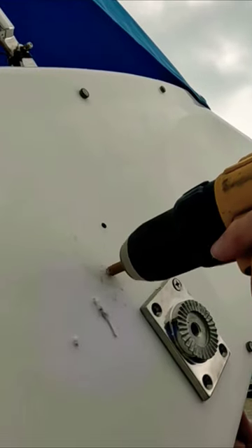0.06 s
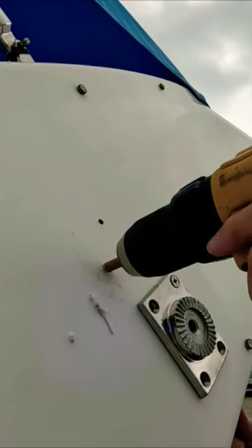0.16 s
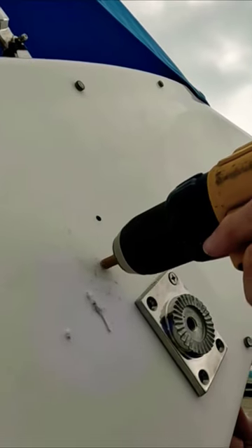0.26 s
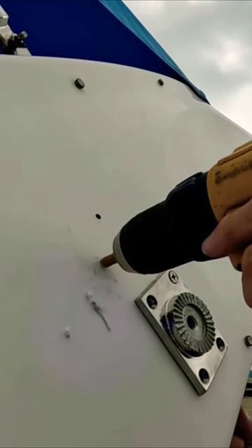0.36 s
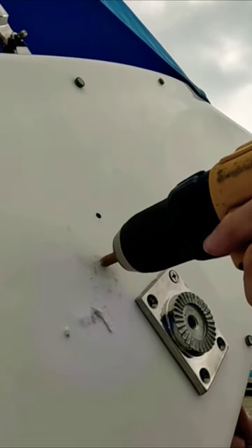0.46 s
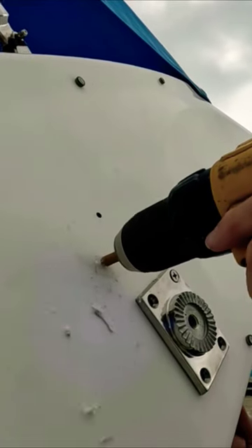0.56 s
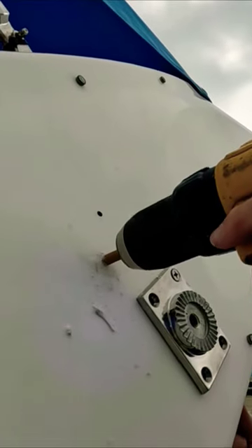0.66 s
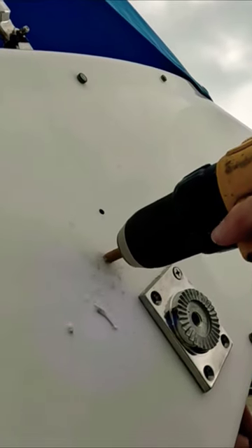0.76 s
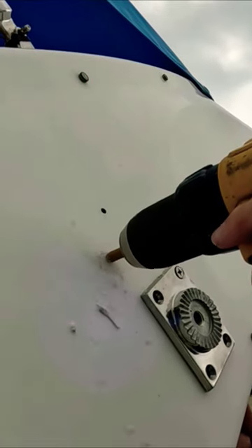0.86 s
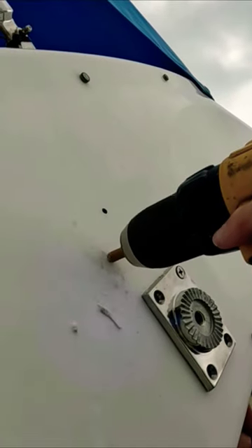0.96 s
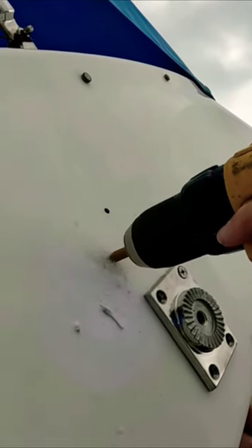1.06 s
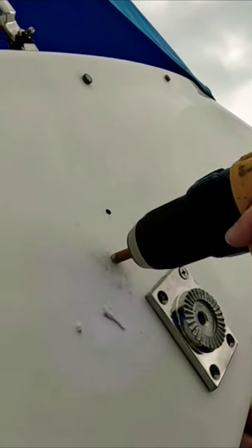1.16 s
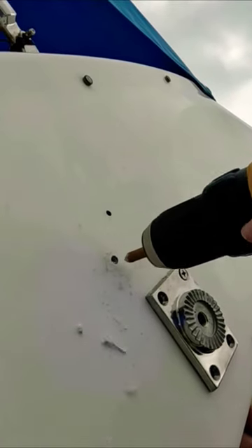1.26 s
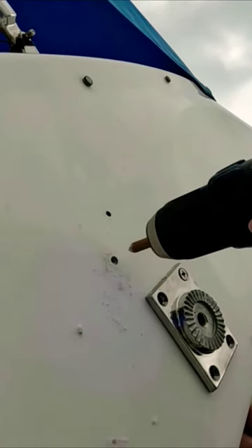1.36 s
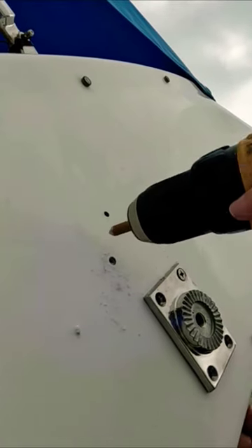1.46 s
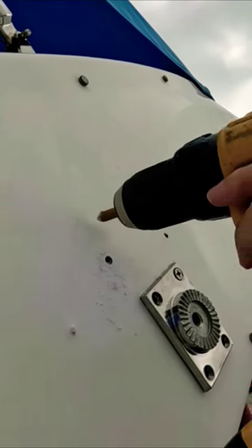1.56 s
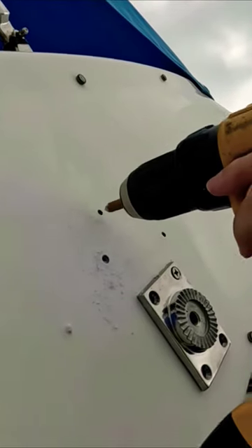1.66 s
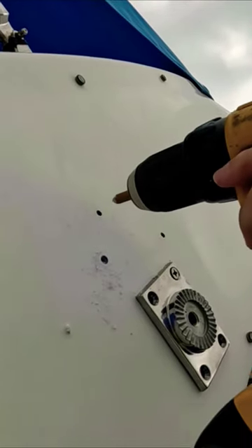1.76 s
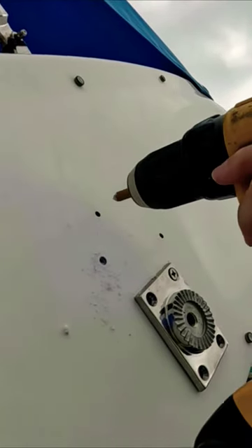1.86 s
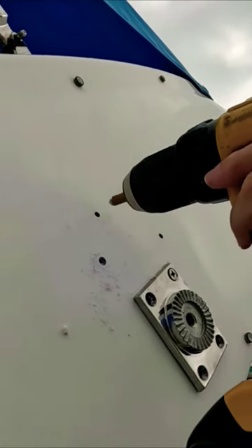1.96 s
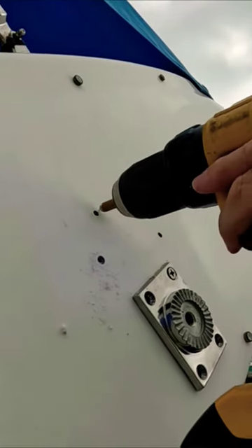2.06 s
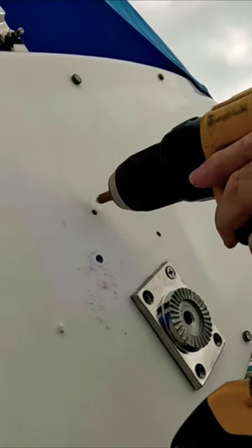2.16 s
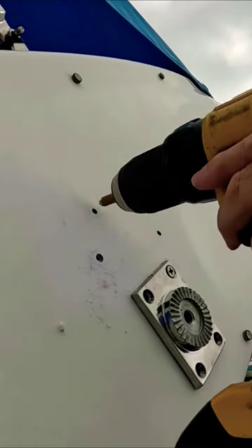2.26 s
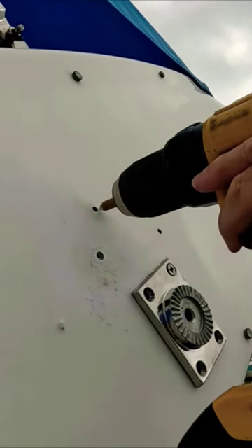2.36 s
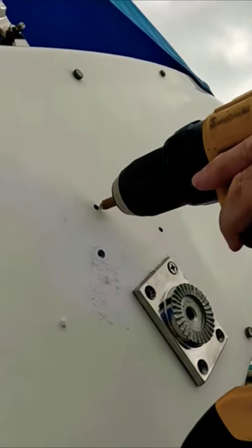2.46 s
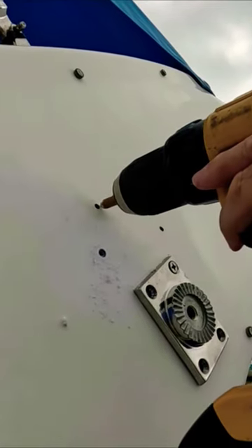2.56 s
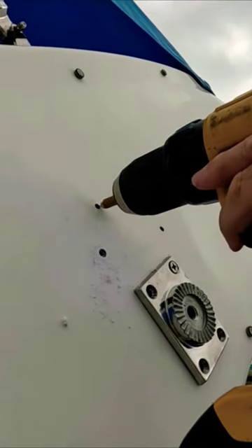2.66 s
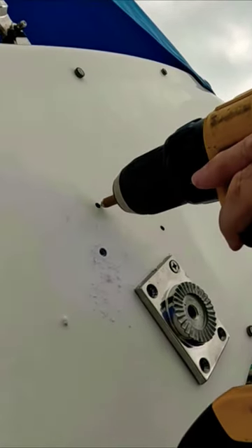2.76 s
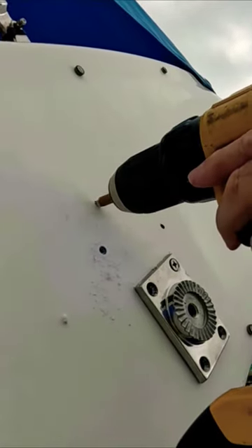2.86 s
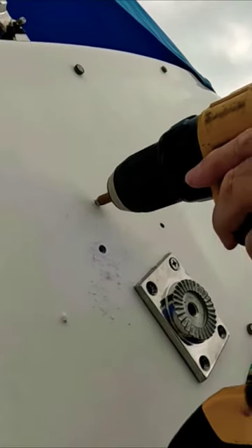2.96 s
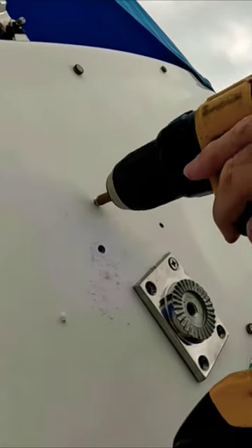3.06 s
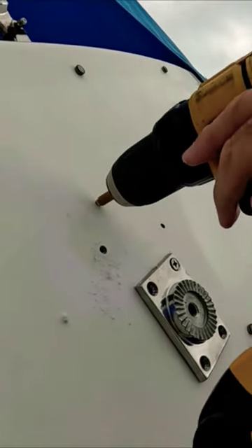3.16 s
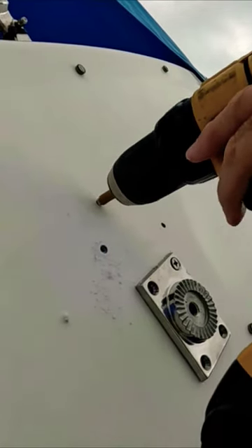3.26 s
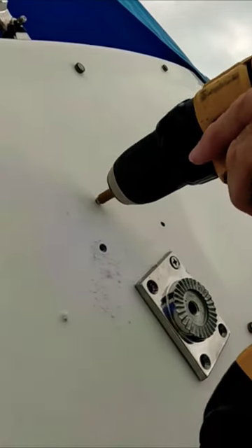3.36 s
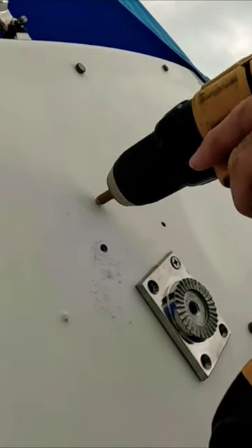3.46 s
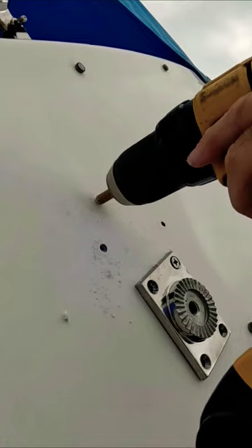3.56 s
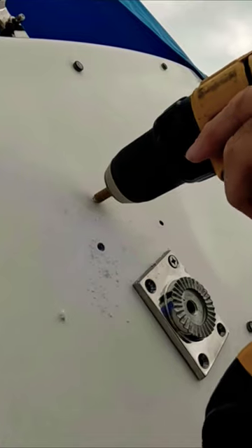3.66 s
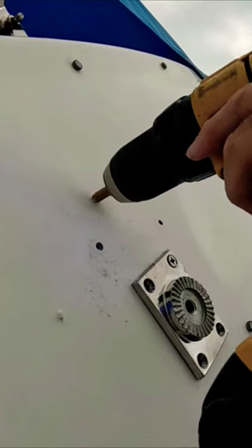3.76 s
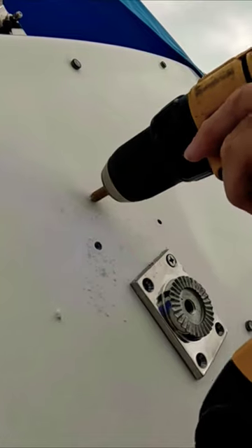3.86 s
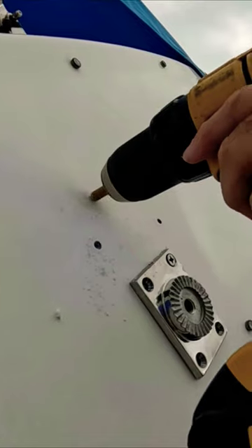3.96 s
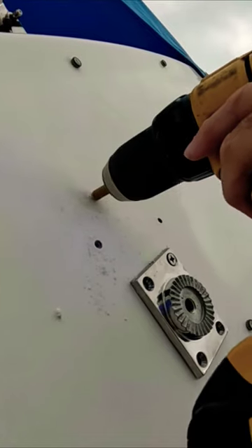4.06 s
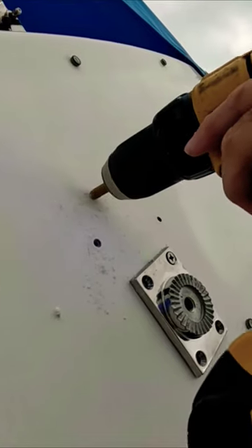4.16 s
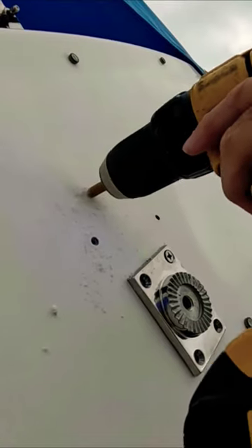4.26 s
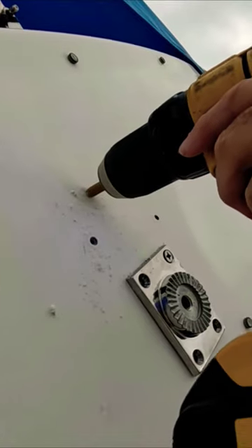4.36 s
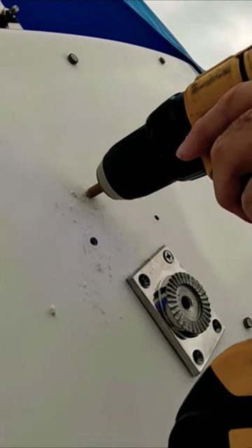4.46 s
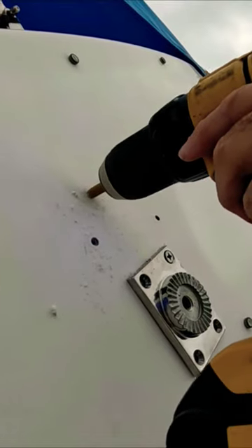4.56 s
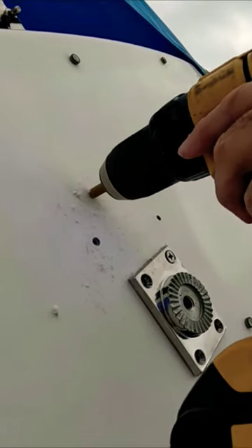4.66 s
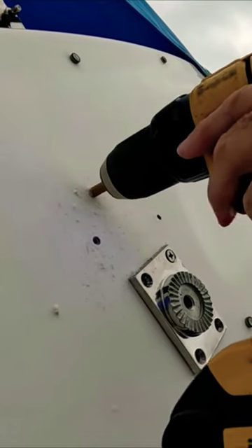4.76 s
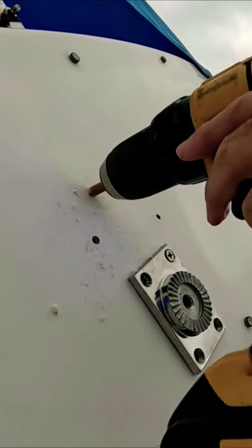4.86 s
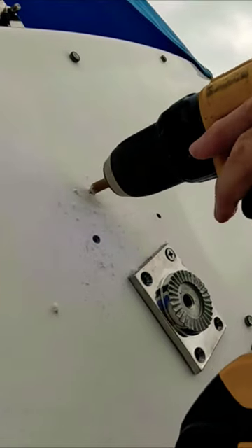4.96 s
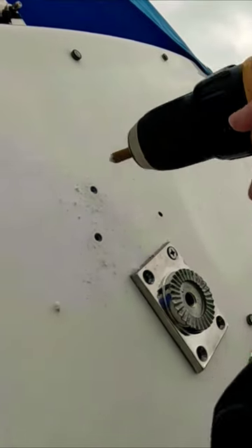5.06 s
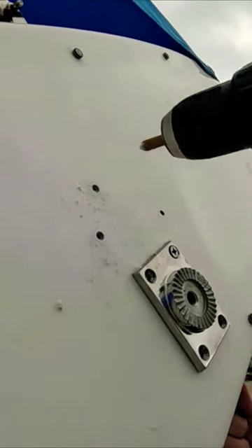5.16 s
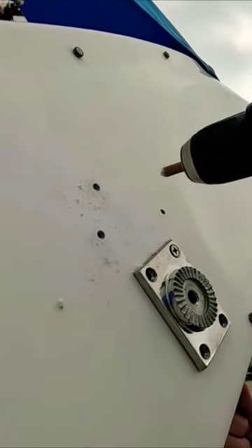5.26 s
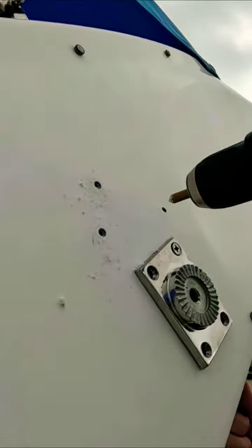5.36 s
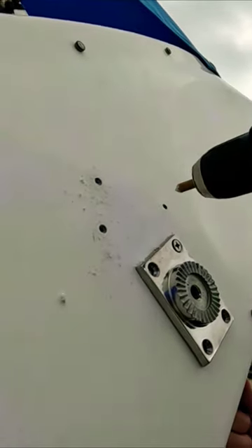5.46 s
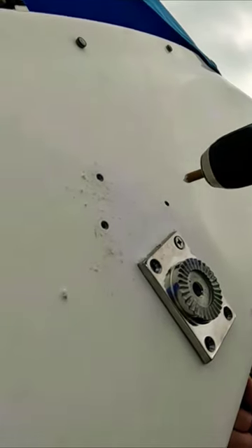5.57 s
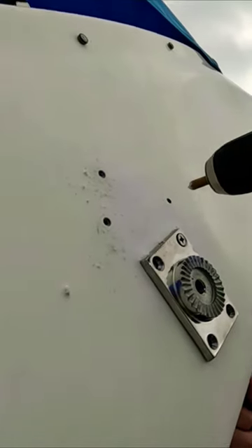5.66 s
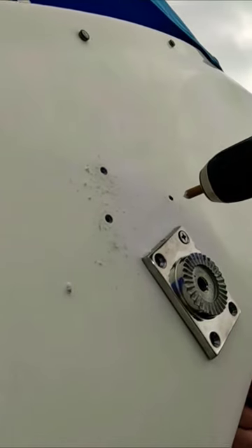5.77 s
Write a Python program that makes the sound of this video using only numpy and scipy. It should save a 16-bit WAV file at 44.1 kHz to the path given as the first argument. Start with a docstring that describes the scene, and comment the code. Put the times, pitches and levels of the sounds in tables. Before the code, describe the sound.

Close drill whine and rattling grind in two runs, separated by a quiet gap with small panel taps over a low harbour rumble.

```python
"""A cordless drill bores two holes in a fibreglass boat panel, outdoors and close to a pair of microphones.
The motor's gears whine along its speed curve and the bit's noise grinds and shakes the panel's modes.
While throttled, its speed control sings one steady note; the slack chuck clacks at each start and stop.
Between the holes the tip bumps the panel, which rings as decaying modes. In the distance a harbour rumbles
as low noise; at the end a sleeve slides as a swell of noise and a faint thin hiss comes in."""
import sys
import numpy as np
from scipy import signal
from scipy.fft import rfft, irfft, next_fast_len
from scipy.io import wavfile
from scipy.ndimage import uniform_filter1d, map_coordinates

SR = 44100
rng = np.random.default_rng(int(sys.argv[2]) if len(sys.argv) > 2 else 0)


def wav_out(sig):
    """Save sig, one row per channel (or a flat mono array), as 16-bit PCM at SR to the path in sys.argv[1]."""
    wavfile.write(sys.argv[1], SR, np.round(np.clip(np.atleast_2d(sig).T, -1, 1) * 32767).astype(np.int16))


N = 256220

# motor speed in each hole, set by trigger and load: (time [s], shaft speed [turns/s])
MOTOR_1 = [(0.0, 239.2), (0.26, 244.5), (0.39, 243.5), (0.56, 238.2), (0.8, 235.2), (0.948, 265.2),
           (1.01, 268.0), (1.056, 254.7), (1.136, 224.0), (1.212, 203.2), (1.256, 199.0), (1.285, 189.5),
           (1.312, 185.5)]
MOTOR_2 = [(3.595, 152.0), (3.612, 208.0), (3.632, 258.0), (3.67, 313.0), (3.72, 339.5), (3.79, 348.0),
           (3.822, 339.0), (3.988, 270.9), (4.022, 268.0), (4.048, 295.0), (4.1, 331.0), (4.164, 342.0),
           (4.32, 285.0), (4.45, 246.5), (4.652, 225.8), (4.708, 223.1), (4.854, 235.8), (4.888, 231.5),
           (4.955, 208.1)]
SPIN_UP_S, COAST_S = 0.03, 0.08  # from rest to the first speed, and from the last speed to rest
WORKING_SPEED = 240  # turns/s, the reference for levels that follow the speed
# gear and commutator lines beside the mesh line, relative levels:
# (multiple of shaft rate [1], half trigger [dB], racing [dB], labouring [dB])
WHINE_LINES = [(15, -47, -53, -51), (17, -50, -42.5, -42), (18, -58, -54, -55), (19, -48, -48, -45),
               (20, -54, -52, -49), (21, -53, -51, -57), (22, -48, -48, -41), (23, -56, -53, -46),
               (24, -56, -56, -58), (25, -56, -53, -49), (26, -50, -62, -51), (27, -59, -58, -53),
               (28, -54, -59, -50), (29, -60, -54, -62), (31, -54, -62, -59), (32, -56, -64, -58),
               (33, -53, -58, -50), (36, -52, -61, -51), (38, -62, -66, -62), (40, -54, -66, -53),
               (41, -63, -66, -53), (43, -69, -70, -56), (45, -65, -73, -60), (46, -72, -76, -53),
               (48, -73, -76, -62)]
MESH = 12  # teeth on the motor's pinion
# level change of the gear mesh line in the first hole: (time [s], level [dB])
MESH_LEVEL_1 = [(0.8, -2), (1.0, -2.5), (1.12, -4), (1.3, -5)]
# the housing's answer to the gear mesh line: (frequency [Hz], level [dB])
HOUSING = [(900, -58), (1900, -27.5), (2300, -38), (2550, -27.5), (2750, -27.5), (3000, -35.5), (3300, -37),
           (3650, -34.5), (4200, -40.5)]
# the housing's narrow rings, which change the level of each other line as it passes: (frequency [Hz], level [dB])
HOUSING_RINGS = [(4700, 0), (5180, -1), (5290, 4), (5400, -2), (5800, 0), (6150, -2), (6380, 2), (6600, -2),
                 (6880, 3), (7200, -1), (8000, 1), (9800, 2), (12000, 0)]
STRAIN_DB, FULL_STRAIN = 5, 3000  # lift of the mesh line while spinning up; turns/s^2 at which it is full
# the gearbox's rough low partials, relative levels: (multiple of shaft rate [1], working [dB], racing [dB])
GROWL_PARTIALS = [(5, 1, -2), (6, -6, -5), (7, -7, -2), (8, -4, -6), (9, -4, -8), (10, -6, -7),
                  (11, -5, -6), (13, -10, -13), (14, -11, -12)]
# the gearbox's answer to them: (frequency [Hz], level [dB])
GEARBOX = [(1150, -15), (1400, -1), (1900, 0), (2250, 1), (2700, -5), (3800, -4)]
# colour of the cut in each hole: (frequency [Hz], density [dB per Hz])
GRIND_COLOUR_1 = [(350, -10), (500, -2), (700, 7.5), (950, 0), (1400, 5), (2200, 3), (3000, 1), (3700, 2),
                  (4400, -5), (5100, -8), (7000, -15), (8000, -12), (9200, -21.5), (15000, -22)]
GRIND_COLOUR_2 = [(350, 4), (500, 2.5), (700, -2.5), (1000, -1), (1500, 1), (2300, -1), (3000, -1.5),
                  (3700, -3), (4400, -9), (5500, -8.5), (7700, -17.5), (9000, -21.5), (12000, -20),
                  (15000, -31)]
# the bit catches for a moment: (time [s], length [s], panel level change [dB], rasp level change [dB])
CATCHES = [(0.545, 0.26, 2, 1), (0.79, 0.14, 5.5, 1), (0.94, 0.24, 3, 0), (1.187, 0.23, 4, 4),
           (1.323, 0.027, -6, 12), (3.63, 0.081, 14, 2), (4.263, 0.04, 11, 1), (4.922, 0.11, 6.5, 3)]
# the panel's modes under the bit: (frequency [Hz], width [Hz], relative level [dB])
PANEL_MODES = [(95, 42, -13.5), (155.5, 44, -5), (211.6, 38, 1), (301, 84, -6.5), (394, 56, -1.5),
               (681, 34, -9.5)]
# the flutes' pushes on the panel: (multiple of shaft rate [1], relative level [dB])
FLUTE_PUSHES = [(0.655, 3), (1.31, -12)]
FLUTE_TURNS, ROCK_TURNS = 0.655, 0.96  # flute passes and rockings of the drill per shaft turn
# how firmly the flutes grip and how much the drill rocks: (time [s], flutes [dB], rocking [dB])
GRIP_1 = [(0.05, -3, -5), (0.24, -6, -4), (0.36, 2, -5), (0.6, 1, 3), (0.68, -8, 2), (0.8, 1, 0),
          (0.9, -1, -10), (1.04, -3, -8), (1.14, -2, -3), (1.3, -12, -11)]
GRIP_2 = [(3.62, -11, -13), (3.8, 0, 1), (3.95, -4.5, -2.5), (4.2, 1.5, -3), (4.4, -0.5, 0),
          (4.52, -10, -9), (4.65, 2, -9), (4.85, 2, -6.5), (4.95, -15, 7.5)]
# the bit wobbles as it enters or breaks through: (start [s], end [s], level [dB])
SWAYS = [(0, 0.36, -26.5), (0.9, 0.96, -31), (3.63, 3.67, -23), (3.92, 4.25, -31), (4.8, 4.88, -33)]
SWAY_RISE_S, SWAY_FALL_S = 0.18, 0.14
# the trigger is only part way in, so the speed control sings: (start [s], end [s], level [dB])
THROTTLING = [(0, 1.015, -27.5), (1.15, 1.275, -30.5), (3.582, 3.585, -31), (3.99, 4.04, -36.5),
              (4.37, 4.73, -36), (4.82, 4.89, -36)]
SWITCH_HZ = 3906  # the rate at which the speed control chops the current
SWITCH_RISE_S, SWITCH_FALL_S = 0.024, 0.018
# the bit binds and the panel groans on one mode: (start [s], end [s], level [dB])
GROANS = [(0.46, 0.53, -35), (0.92, 0.97, -34), (1.11, 1.24, -32), (4.06, 4.11, -33)]
GROAN_HZ, GROAN_RISE_S, GROAN_FALL_S = 401.6, 0.056, 0.022
# the bit is through and runs free: (start [s], end [s], level [dB])
FREE_RUN = [(1.255, 1.31, 0.5)]
FREE_RISE_S, FREE_FALL_S = 0.026, 0.042
# the lines that stand out meanwhile: (multiple of shaft rate [1], relative level [dB])
FREE_LINES = [(12, -43), (19, -42), (27, -45)]
# gears and chuck clack; the last three levels are relative to the first:
# (time [s], level [dB], panel thud [dB], steel click [dB], body knock [dB])
CLACKS = [(1.315, -19.5, 1, 1, 4.5), (1.3327, -10.5, -7.5, 5.5, 6.5), (1.336, -20, 11, -15, 4),
          (1.343, -25, 6, 9, -5), (1.355, -27, 6, 5.5, 2), (1.3731, -17.5, 3.5, -2, -1),
          (1.394, -28, -2, 1, 3), (1.399, -34, 5, 6, -9), (1.407, -41, 20, 0, -9), (1.43, -45, 1, 17, -11),
          (1.495, -46, -5, -14, 7), (3.529, -37.5, 0, 1, -10), (3.543, -33, -3, -6, -6),
          (3.5686, -15.5, -21, -10, -15), (3.587, -11.5, -11, -15, -7), (3.592, -14.5, -9, -1, -8),
          (3.595, -20, 6.5, -14, -11), (4.955, -9.5, -14, -2, -19), (4.961, -30, -19, -4, -25),
          (4.978, -25.5, 1, -12, -6), (4.992, -32, -6, -12, 0), (5.021, -27.5, -12, -12, -9),
          (5.028, -35, -12, 1, -12), (5.142, -46, -10, -3, -8)]
# colour of the crack and rattle: (frequency [Hz], density [dB per Hz])
CLACK_COLOUR = [(180, 1), (350, -33), (520, -5.5), (680, -21), (850, -3), (1300, -6), (1900, -3.5),
                (3000, -9.5), (4200, -17), (5500, -16), (8000, -23), (10000, -30), (15000, -39)]
# colour of the chuck's steel click: (frequency [Hz], density [dB per Hz])
STEEL_COLOUR = [(1500, -42), (3200, -11), (4100, 7.5), (5300, -9), (6500, -10), (8000, -6.5), (9500, -40),
                (15000, -29)]
# the jolted drill body's ring: (frequency [Hz], relative level [dB], time to fall 60 dB [s])
BODY_MODES = [(690, 1.5, 0.082), (846, -7, 0.14), (1021, -8.5, 0.12), (1368, 0, 0.064), (1560, 1, 0.042),
              (2480, -8, 0.07), (3200, -12, 0.097), (4080, -9, 0.029), (4150, -12, 0.043)]
# change of the panel's ring with the bit held in the hole: (frequency [Hz], level [dB])
PINNED = [(230, 0), (320, -4), (390, -9), (500, 0), (900, 3)]
# the panel's ring after a blow: (frequency [Hz], relative level [dB], time to fall 60 dB [s])
THUD_MODES = [(80.5, 3, 0.17), (136.6, -1, 0.34), (182.3, 1, 0.16), (242, -5, 0.16), (319.2, -5.5, 0.2),
              (386.3, 2.5, 0.12), (480, -10, 0.12), (590, -12.5, 0.077), (877, -16, 0.088),
              (1230, -22, 0.042), (1370, -27, 0.052), (1700, -21, 0.027)]
# the tip lands on the panel three times, stuttering and hopping: (time [s], relative thud [dB], tick [dB])
BUMPS = [(2.286, -13, -27), (2.2902, -15, -36), (2.304, -17.5, -28.5), (2.526, -12.5, -19.5),
         (2.5315, -14, -35), (2.546, -22.5, -28), (2.57, -23, -37), (2.611, -18.5, -34), (2.635, -25, -37),
         (3.048, -17.5, -27.5), (3.0533, -15.5, -31.5), (3.062, -18.5, -32.5), (3.134, -22, -34.5),
         (3.151, -26, -39)]
# colour of the tick: (frequency [Hz], density [dB per Hz])
TICK_COLOUR = [(200, 16.5), (900, 16), (2200, 4), (3200, -8), (6000, -19), (9000, -33.5), (15000, -48)]
# colour of the harbour: (frequency [Hz], density [dB per Hz])
HARBOUR_COLOUR = [(12, -8), (26, -3.5), (40, -2), (60, -7.5), (100, -8), (150, -12), (250, -18.5),
                  (450, -27.5), (650, -32.5), (1050, -31), (2000, -43.5), (4200, -55.5), (7500, -68.5),
                  (9500, -78.5), (15000, -101.5)]
# a distant engine's hum: (time [s], relative level [dB])
HUM_LEVEL = [(0, -34), (1.5, -42), (2.0, -38.5), (3.4, -31), (5.0, -37.5), (5.8, -40.5)]
# cloth slides as the arm draws back: (time [s], rub [dB], swish [dB])
SLEEVE_LEVEL = [(5.0, -60, -70), (5.17, -50, -64), (5.27, -48.5, -62.5), (5.41, -49, -56.5),
                (5.5, -51, -67), (5.81, -57, -67)]
# colour of the rub: (frequency [Hz], density [dB per Hz])
RUB_COLOUR = [(300, 7.5), (700, 0), (1130, 8.5), (1700, -6), (3000, -23), (5500, -34), (14000, -48)]
# colour of the swish: (frequency [Hz], density [dB per Hz])
SWISH_COLOUR = [(900, -18), (1600, 1), (2500, 2), (3900, -2), (5000, -15), (7000, -20), (9000, -20),
                (14000, -36)]
# a faint thin hiss at the end: (time [s], level [dB])
HISS_LEVEL = [(5.38, -84), (5.46, -71), (5.6, -71), (5.81, -73)]
# colour of the hiss: (frequency [Hz], density [dB per Hz])
HISS_COLOUR = [(3500, -20), (5000, -2), (6300, -15), (6700, 0), (7150, -12), (8500, -14), (13000, -18)]
# left-right likeness at the microphones of noise from close by: (frequency [Hz], correlation [1])
NEAR_ALIKE = [(170, 1), (300, 0.98), (550, 0.99), (1200, 0.97), (2500, 0.92), (5000, 0.71), (9000, 0.82),
              (13000, 0.062)]
# left-right likeness of the distant harbour: (frequency [Hz], correlation [1])
FAR_ALIKE = [(25, 0.9994), (180, 0.9997), (550, 0.99), (1650, 0.97), (4970, 0.95), (15000, 0.63)]
TOP_HZ = 15200  # top of the microphones' band


def amp(db):
    """Decibels to gain."""
    return 10 ** (np.asarray(db) / 20)


def unit(x):
    """Scaled to rms 1."""
    return x / np.sqrt(np.mean(x ** 2) + 1e-20)


def along(points, hz):
    """(Hz, value) points joined on a log frequency axis."""
    f, v = np.transpose(points)
    return np.interp(np.log(hz + 1), np.log(f + 1), v)


def curves(rows):
    """One value per sample for each column after the time."""
    s, *cols = np.transpose(rows)
    return [np.interp(np.arange(N) / SR, s, c) for c in cols]


def gate(rows, rise=0.0068, fall=0.13):
    """Open from the first row's time to the last row's, with a short rise before and fall after, in s."""
    start, end = rows[0][0], rows[-1][0]
    return np.interp(np.arange(N) / SR, [start - rise, start, end, end + fall], [0, 1, 1, 0])


def bouts(rows, rise, fall):
    """Attack, hold and release for each (start s, end s, dB) row."""
    return sum(amp(db) * gate([(start,), (end,)], rise, fall) for start, end, db in rows)


def wobble(rate):
    """A smooth random curve, rate knots a second."""
    knots = rng.standard_normal(int(N * rate / SR) + 4)
    coarse = np.arange(0, N + 32, 32)
    return np.interp(np.arange(N), coarse, map_coordinates(knots, [coarse * rate / SR]))


def filtered(x, response):
    """x times a response of frequency, real or complex."""
    m = next_fast_len(N + SR // 2)
    return irfft(rfft(x, m) * response(np.fft.rfftfreq(m, 1 / SR)), m)[..., :N]


def rush(spectrum, drive=1, alike=NEAR_ALIKE):
    """Coloured noise of rms 1 at two microphones, whose likeness depends on frequency."""
    def mid_side(hz):
        turn = np.arccos(np.clip(along(alike, hz), -1, 1)) / 2
        return amp(along(spectrum, hz)) * [np.cos(turn), np.sin(turn)]
    mid, side = filtered(rng.standard_normal((2, N)) * drive, mid_side)
    return unit(np.array([mid + side, mid - side]))


def add(track, s, sound):
    """Mix a sound in at a time."""
    part = track[..., round(s * SR):][..., :sound.shape[-1]]
    part += sound[..., :part.shape[-1]]


def harbour(air_db=-34, hum_db=-1):
    """Low distant outdoor rumble with the wavering hum of a far engine, a narrow band of noise near 96 Hz."""
    hum_colour = [(60, -36), (86, 9.5), (96, 15.0), (106, 4.0), (150, -67.0), (300, -120)]
    hum = rush(hum_colour, alike=FAR_ALIKE)
    air = rush(HARBOUR_COLOUR, alike=FAR_ALIKE)
    return amp(air_db + 0.56 * wobble(5.1)) * air + amp(curves(HUM_LEVEL)[0] + hum_db) * hum


def spin(motor):
    """Shaft turns per s: up from rest, along the speed curve, then coasting to a stop."""
    speed = curves([(motor[0][0] - SPIN_UP_S, 0), *motor, (motor[-1][0] + COAST_S, 0)])[0]
    return np.maximum(uniform_filter1d(speed, size=700), 1)  # never quite zero, for the logarithm in effort


def racing(motor):
    """0 up to working speed, 1 when the motor races."""
    return np.interp(spin(motor), [240, 280], [0, 1])


def effort(motor, db_per_octave):
    """Level in dB that follows the speed."""
    return db_per_octave * np.log2(spin(motor) / WORKING_SPEED)


def shaft(motor, jitter):
    """Shaft angle in radians; the bite of the bit makes the speed tremble, more when it races."""
    speed = spin(motor)
    tremble = jitter * (speed / WORKING_SPEED) ** 2 * wobble(90)
    return 2 * np.pi * np.cumsum(speed * (1 + tremble)) / SR


def line(angle, multiple, db, flutter_db, spread, smear=0):
    """One fluttering motor line, its phase smeared by chatter and slightly out of step at the two microphones."""
    start, lead = rng.uniform(0, 2 * np.pi), rng.normal() * spread * multiple
    fading_db = 1.5 * wobble(7) * (multiple != MESH)  # all but the mesh line slowly come and go
    phase = multiple * angle + start + smear * wobble(220)
    level = amp(db + fading_db + flutter_db * wobble(60))
    return np.sqrt(2) * level * np.sin(phase + np.array([[lead], [-lead]]))


def whine(motor, angle, line_dbs, mesh_db, upper_db, mesh_flutter_db, flutter_db):
    """The gear mesh line, loudest where it meets the housing's resonance, and a comb of other shaft multiples."""
    speed = spin(motor)
    acceleration = uniform_filter1d(np.gradient(speed) * SR, size=5000)
    unsettled = np.clip(np.abs(acceleration) / 200, 0, 1)
    smear = .2 + .45 * racing(motor)
    comb = 0
    for (multiple, *_), db in zip(WHINE_LINES, line_dbs):
        ring_db = along(HOUSING_RINGS, multiple * speed)
        loss_db = 4 * (multiple > 30) * unsettled  # the highest lines weaken while the speed changes
        comb = comb + line(angle, multiple, db + ring_db - loss_db, flutter_db, spread=0.0046, smear=smear)
    strain_db = STRAIN_DB * np.clip(acceleration / FULL_STRAIN, 0, 1)
    housing_db = along(HOUSING, MESH * speed)
    mesh = line(angle, MESH, housing_db + mesh_db + strain_db, mesh_flutter_db, spread=0.0037)
    driven = gate(motor, rise=.004, fall=.02)
    return driven * (mesh + amp(upper_db) * np.clip(speed / 200, 0, 1) ** 3 * comb)


def growl(motor, angle, growl_db, db_per_octave, unrest, wander):
    """Slack gear teeth: low shaft partials waver in strength, and in phase by wander radians, unrest knots a second."""
    speed, fast = spin(motor), racing(motor)
    partials = 0
    for multiple, db, fast_db in GROWL_PARTIALS:
        level_db = db + fast * (fast_db - db) + along(GEARBOX, multiple * speed) + 3 * wobble(90)
        partials = partials + amp(level_db) * np.sin(multiple * angle + wander * wobble(unrest))
    return np.sqrt(2) * gate(motor) * amp(growl_db + effort(motor, db_per_octave)) * partials


def panel(hz):
    """The panel's response to a push: a sum of resonances of alternating sign."""
    return sum((-1) ** k * amp(db) * 1j * hz * width / (centre ** 2 - hz * hz + 1j * hz * width)
               for k, (centre, width, db) in enumerate(PANEL_MODES))


def catches():
    """Level changes in dB of the panel and of the rasp: one smooth swell for each catch."""
    t = np.arange(N) / SR
    return sum(np.outer([panel_db, rasp_db], np.exp(-(2 * (t - s) / length) ** 2))
               for s, length, panel_db, rasp_db in CATCHES)


def shudder(motor, angle, grip, tone_db, rough_db, db_per_octave):
    """Sway, flute pushes and rocking keep step with the shaft and shake the panel; chips knock it at random."""
    def tone(multiple, db, unrest):
        level = amp(db + unrest * (2.4 * wobble(24) - .7))
        return level * np.sin(multiple * angle + .28 * unrest * wobble(30))
    flute_db, rock_db = curves(grip)
    push = sum(tone(multiple, db + flute_db, unrest=1) for multiple, db in FLUTE_PUSHES)
    push = push + tone(ROCK_TURNS, rock_db, unrest=2.16)
    level = amp(effort(motor, db_per_octave)) * gate(motor)
    catch_db = catches()[0]
    tones = filtered(push * level * amp(catch_db), lambda hz: 0.53 + np.abs(panel(hz)))
    chips = rng.standard_normal(N) * amp(1.3 * wobble(120))
    knocks = amp(catch_db / 2) * unit(filtered(chips, panel))
    sway_level = np.sqrt(2) * bouts(SWAYS, SWAY_RISE_S, SWAY_FALL_S) * gate(motor)
    sway = sway_level * tone(FLUTE_TURNS / 2, 0, unrest=0.42)
    return sway + amp(tone_db) * tones + amp(rough_db) * level * knocks


def rattle(angle, scatter=1.2, spread_db=4):
    """The bit knocks against the wall of the hole about once a turn, unevenly in time and strength."""
    turns = np.floor((angle + scatter * wobble(150)) / (2 * np.pi))
    knocks = np.diff(turns, prepend=turns[0]) != 0
    return knocks * amp(spread_db * np.clip(rng.standard_normal(N), -2, 1))


def cut(motor, colour, angle, grind_db, rasp_db, db_per_octave, bite, chips_db, rattle_db, rattle_t60=0.0091):
    """Flutes scrape in pulses and tear off chips: a grinding, rattling body and a rasp, both louder with speed."""
    pulses = 1 + bite * np.cos(angle * FLUTE_TURNS + wobble(30))
    drive = pulses * amp(chips_db * wobble(500) + 0.45 * wobble(70))
    bursts = signal.lfilter([1], [1, -amp(-60 / (rattle_t60 * SR))], rattle(angle))  # each knock dies away
    noise = rush(colour, drive)
    muffle = lambda hz: 1 / (1 + (hz / 4000) ** 6)
    low = filtered(noise, muffle)
    rattling = filtered(rush(colour, bursts * drive), muffle)
    body = unit(unit(low) + amp(rattle_db) * unit(rattling))
    rasp = unit(noise - low)
    level = gate(motor, rise=0.029, fall=0.046) * amp(effort(motor, db_per_octave))
    return level * (amp(grind_db) * body + amp(rasp_db + catches()[1]) * rasp)


def run_down(angle):
    """With the bit through, the slowing motor's lines come clear."""
    lines = sum(line(angle, multiple, db, flutter_db=0.5, spread=0.008) for multiple, db in FREE_LINES)
    return bouts(FREE_RUN, FREE_RISE_S, FREE_FALL_S) * lines


def first_hole():
    """Half trigger: a fairly even speed, sagging under load, until the bit is through."""
    angle = shaft(MOTOR_1, jitter=.0004)
    motor = whine(MOTOR_1, angle, [row[1] for row in WHINE_LINES], mesh_db=curves(MESH_LEVEL_1)[0],
                  upper_db=.8, mesh_flutter_db=1.1, flutter_db=1.8)
    gears = growl(MOTOR_1, angle, growl_db=-40, db_per_octave=4, unrest=170, wander=1.3)
    shaking = shudder(MOTOR_1, angle, GRIP_1, tone_db=-28.8, rough_db=-30.5, db_per_octave=-1)
    cutting = cut(MOTOR_1, GRIND_COLOUR_1, angle, grind_db=-31.0, rasp_db=-39, db_per_octave=9.5,
                  bite=0.043, chips_db=0.75, rattle_db=-11)
    return motor + gears + shaking + run_down(angle) + cutting


def switching(octave_db=-25):
    """The chopped motor current makes the windings sing at one fixed rate and, faintly, its octave."""
    phase = 2 * np.pi * SWITCH_HZ * np.arange(N) / SR + 0.5 * wobble(83)
    lead = np.array([[.25], [-.25]])  # radians, out of step at the two microphones
    note = np.sin(phase + lead) + amp(octave_db + 1.3 * wobble(57)) * np.sin(2 * phase + lead)
    flutter_db = .9 * wobble(90)
    return np.sqrt(2) * bouts(THROTTLING, SWITCH_RISE_S, SWITCH_FALL_S) * amp(flutter_db) * note


def groan():
    """The binding bit keeps one mode of the panel sounding."""
    phase = 2 * np.pi * GROAN_HZ * np.arange(N) / SR + .3 * wobble(25)
    return np.sqrt(2) * bouts(GROANS, GROAN_RISE_S, GROAN_FALL_S) * np.sin(phase)


def struck(modes, t, attack=0.00031):
    """A struck body rings; each blow favours other modes, so strengths and pitches shift."""
    detune = 1 + rng.normal(0, .03, len(modes))
    ring = 0
    for k, (hz, db, t60) in enumerate(modes):
        decay = amp(db + rng.normal(0, 3.2) - 60 * t / t60)
        ring = ring + (-1) ** k * decay * np.sin(2 * np.pi * hz * detune[k] * t)
    return ring * (1 - np.exp(-t / attack))


def clacks(crack_db=-3, crack_t60=0.0096, rattle_db=-16, rattle_t60=0.1, thud_db=-11,
           click_db=-3, click_t60=0.01, knock_db=-15, rise=0.00057):
    """Slack in gears and chuck is taken up: crack and rattle, body knock, steel click and a jolt to the panel."""
    ring, crack, click, t = np.zeros(N), np.zeros(N), np.zeros(N), np.arange(SR // 2) / SR
    contact = 1 - np.exp(-t / rise)
    crack_decay = amp(crack_db - 60 * t / crack_t60) + amp(rattle_db - 60 * t / rattle_t60)
    pinned = [(hz, db + along(PINNED, hz), t60) for hz, db, t60 in THUD_MODES]
    for s, db, low_db, steel_db, body_db in CLACKS:
        add(crack, s, amp(db) * contact * crack_decay)
        add(click, s, amp(db + steel_db + click_db - 60 * t / click_t60) * contact)
        add(ring, s, amp(db + low_db + thud_db) * struck(pinned, t))
        add(ring, s, amp(db + body_db + knock_db) * struck(BODY_MODES, t))
    return ring + crack * rush(CLACK_COLOUR) + click * rush(STEEL_COLOUR)


def bumps(thud_db=-8, tick_t60=0.056, tick_rise=0.0025):
    """The tip lands, stutters and rebounds: each contact is a panel thud and a short scratchy tick as it skids."""
    ring, tick, t = np.zeros(N), np.zeros(N), np.arange(SR // 2) / SR
    for s, db, scratch_db in BUMPS:
        add(ring, s, amp(db + thud_db) * struck(THUD_MODES, t))
        add(tick, s, amp(scratch_db - 60 * t / tick_t60) * (1 - np.exp(-t / tick_rise)))
    return ring + tick * rush(TICK_COLOUR)


def second_hole():
    """Full trigger: the motor races and growls, then labours as the bit sinks in."""
    angle = shaft(MOTOR_2, jitter=.001)
    fast = racing(MOTOR_2)
    line_dbs = (fast * fast_db + (1 - fast) * slow_db for _, _, fast_db, slow_db in WHINE_LINES)
    motor = whine(MOTOR_2, angle, line_dbs, mesh_db=0, upper_db=.2, mesh_flutter_db=1.6 + fast, flutter_db=2.6)
    gears = growl(MOTOR_2, angle, growl_db=-40.3, db_per_octave=14, unrest=80, wander=.75)
    shaking = shudder(MOTOR_2, angle, GRIP_2, tone_db=-33, rough_db=-33, db_per_octave=7)
    cutting = cut(MOTOR_2, GRIND_COLOUR_2, angle, grind_db=-29.0, rasp_db=-36.0, db_per_octave=4.5,
                  bite=0.032, chips_db=0.2 + 0.49 * fast, rattle_db=-5.5)
    return motor + gears + shaking + cutting


def sleeve():
    """Cloth slides as the drill is drawn away: a dull rub swells first, then a grainy swish."""
    rub_db, swish_db = curves(SLEEVE_LEVEL)
    folds_db = 1.4 * wobble(22)
    rub = amp(rub_db) * rush(RUB_COLOUR)
    swish = amp(swish_db + 1.5 * wobble(150)) * rush(SWISH_COLOUR)
    return gate(SLEEVE_LEVEL) * amp(folds_db) * (rub + swish)


def hiss():
    """A faint hiss, noise with thin bands standing out of it."""
    return amp(curves(HISS_LEVEL)[0]) * gate(HISS_LEVEL) * rush(HISS_COLOUR)


def scene():
    """The drill sits close and slightly to the right, which shows only above the bass."""
    drill = first_hole() + switching() + groan() + clacks() + second_hole()
    lean = lambda hz: amp(np.outer([-1, 1], along([(500, 0), (1200, 0.22)], hz)))  # dB, left down and right up
    return harbour() + filtered(drill, lean) + bumps() + sleeve() + hiss()


def record(dry):
    """The microphones' band ends steeply at its upper limit."""
    return filtered(dry, lambda hz: 1 / (1 + (hz / TOP_HZ) ** 120))


dry = scene()
out = record(dry)
wav_out(out)
```